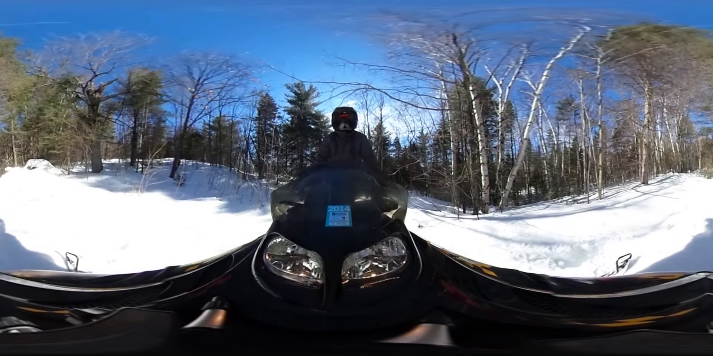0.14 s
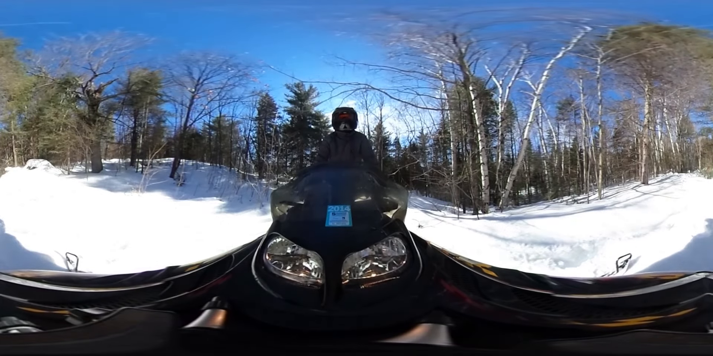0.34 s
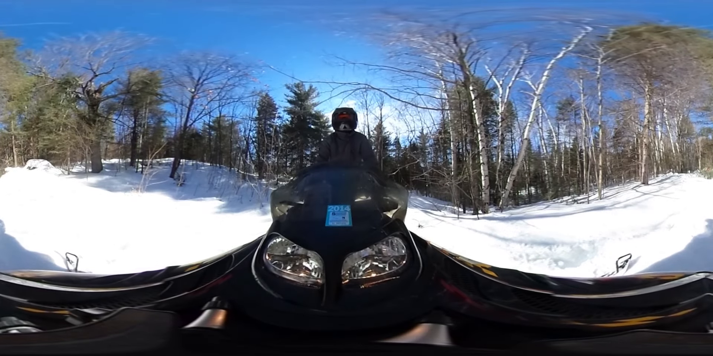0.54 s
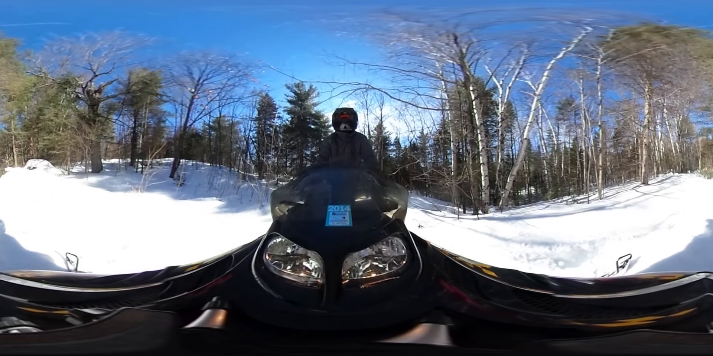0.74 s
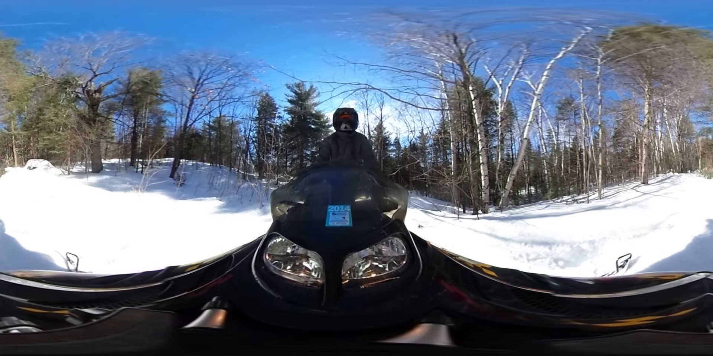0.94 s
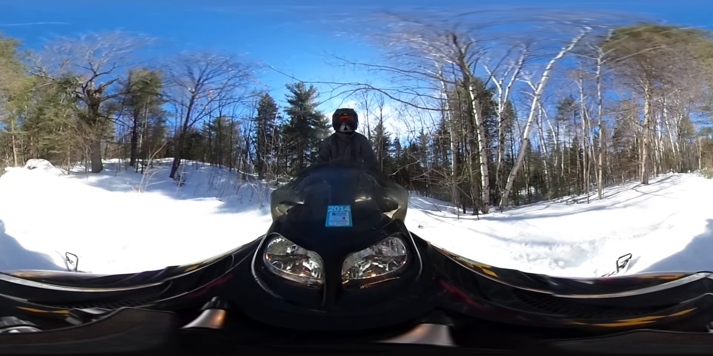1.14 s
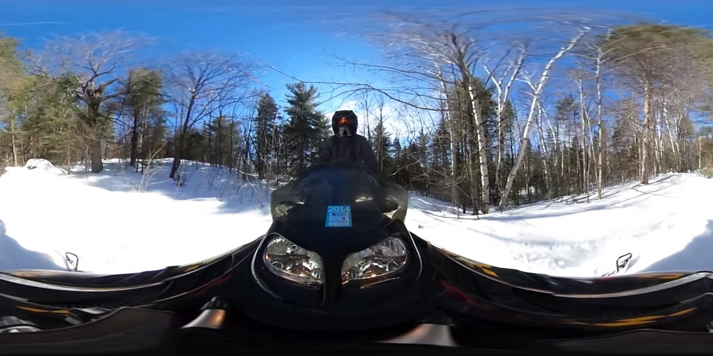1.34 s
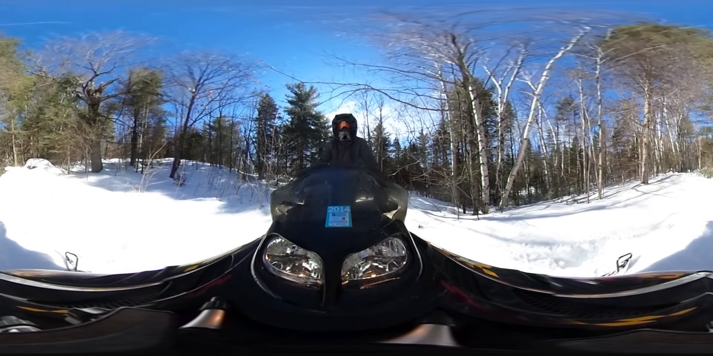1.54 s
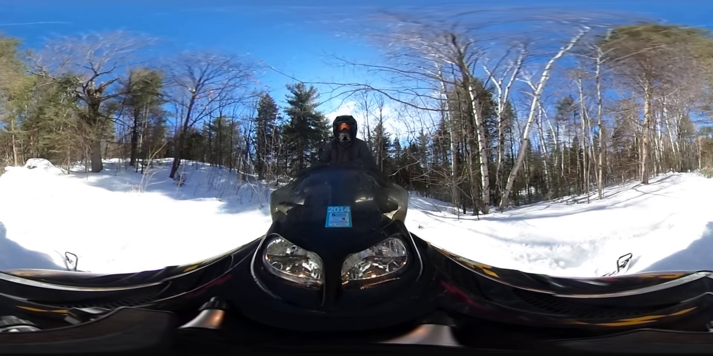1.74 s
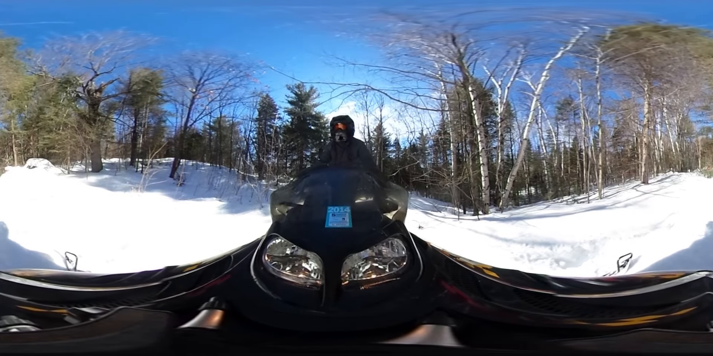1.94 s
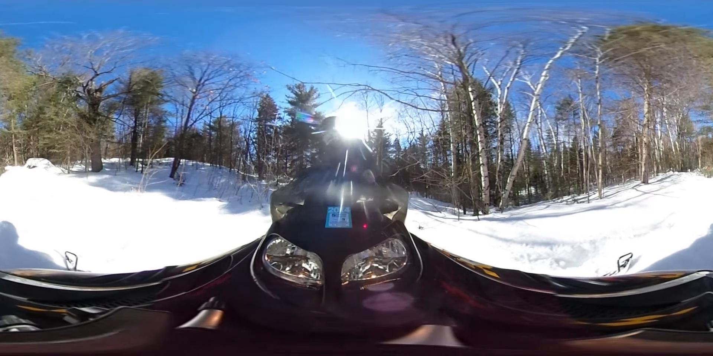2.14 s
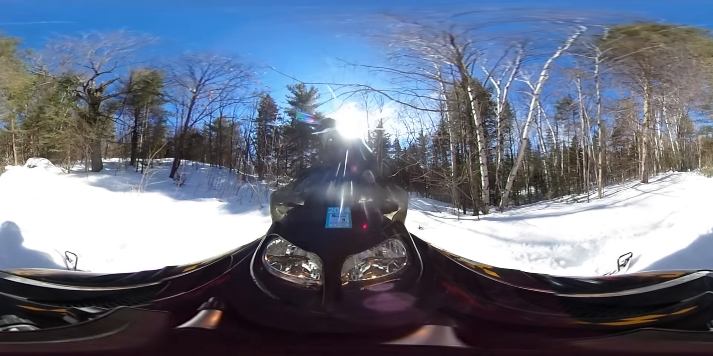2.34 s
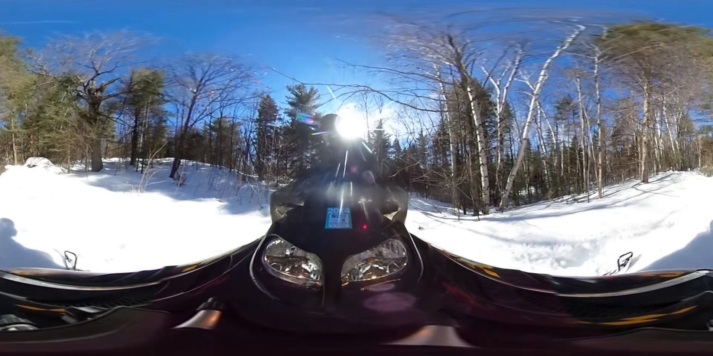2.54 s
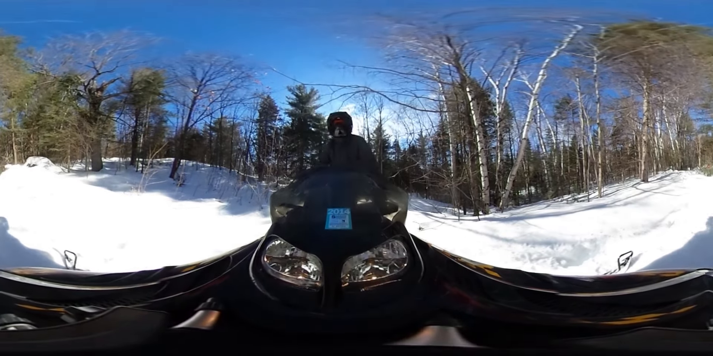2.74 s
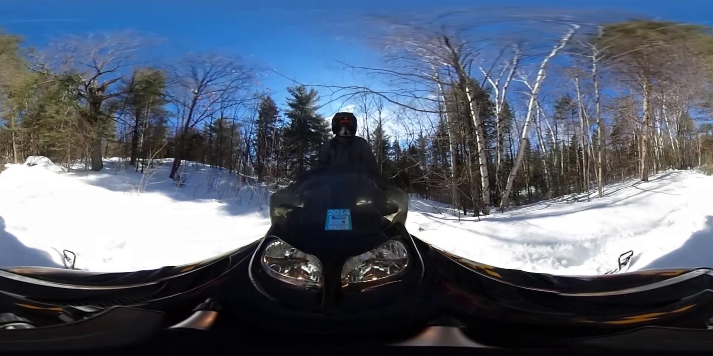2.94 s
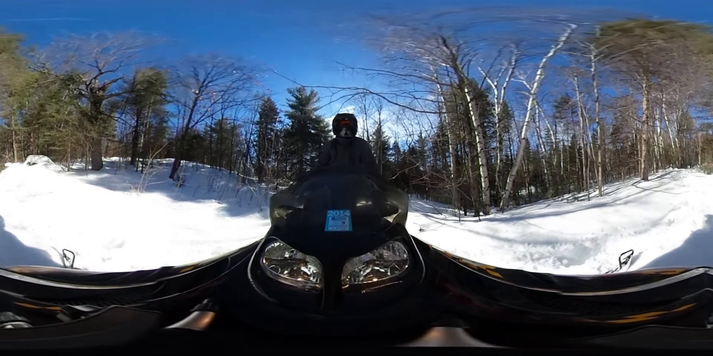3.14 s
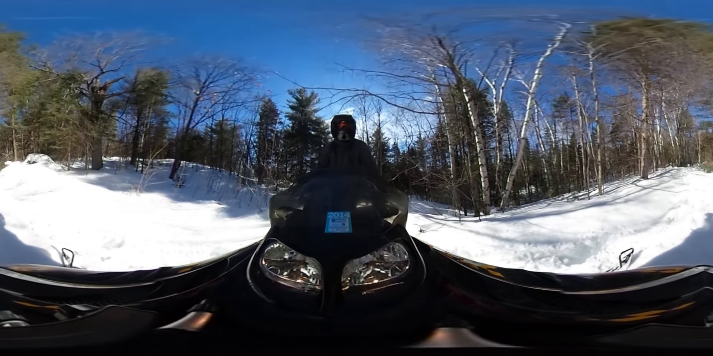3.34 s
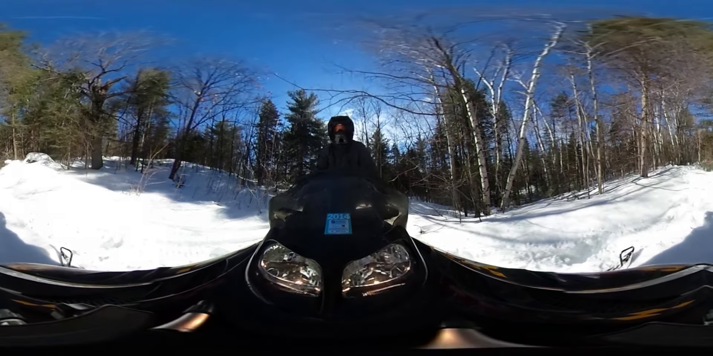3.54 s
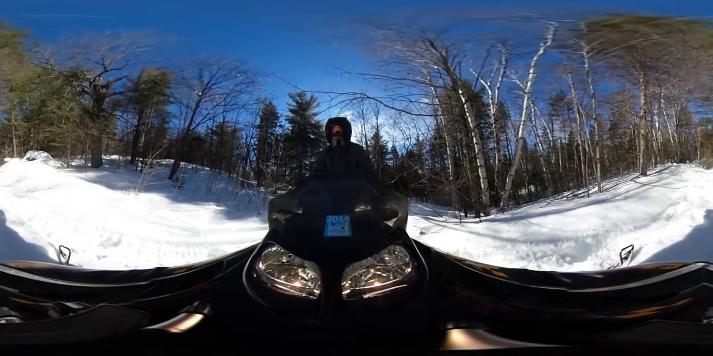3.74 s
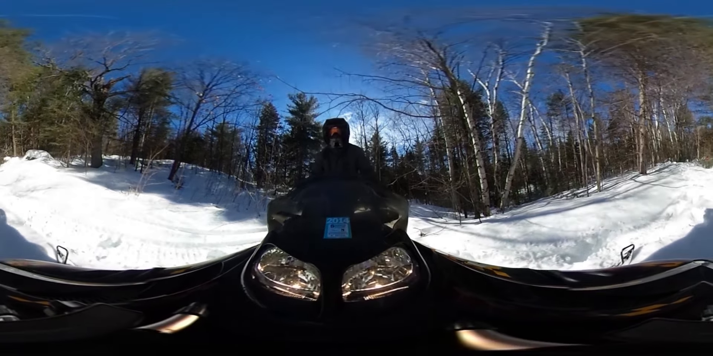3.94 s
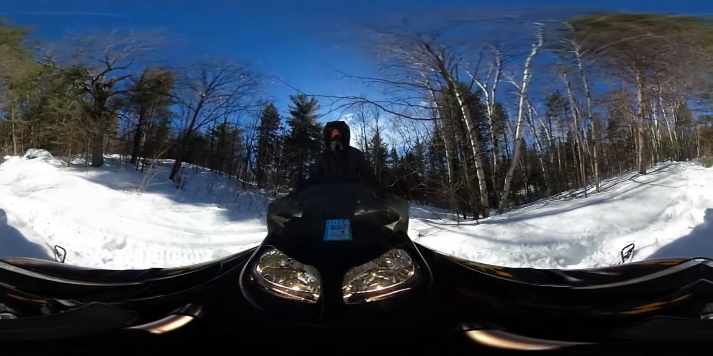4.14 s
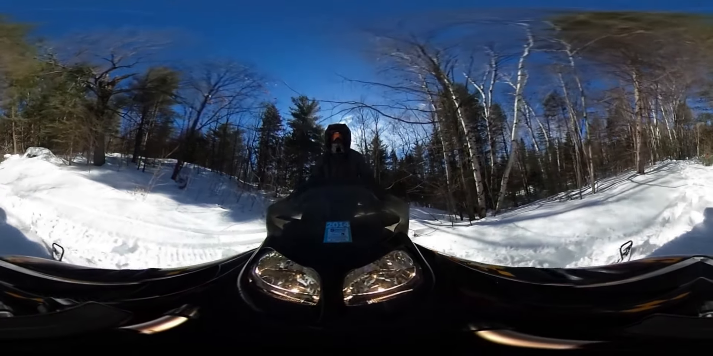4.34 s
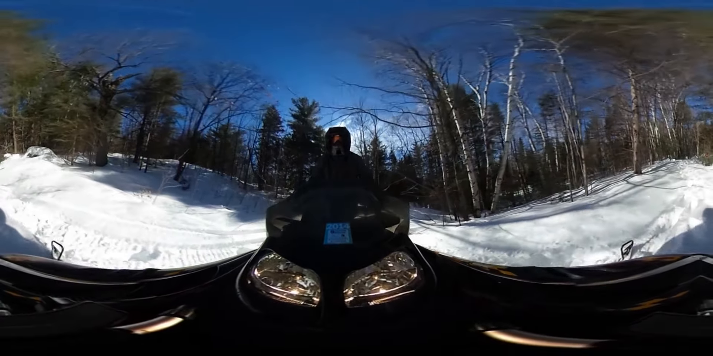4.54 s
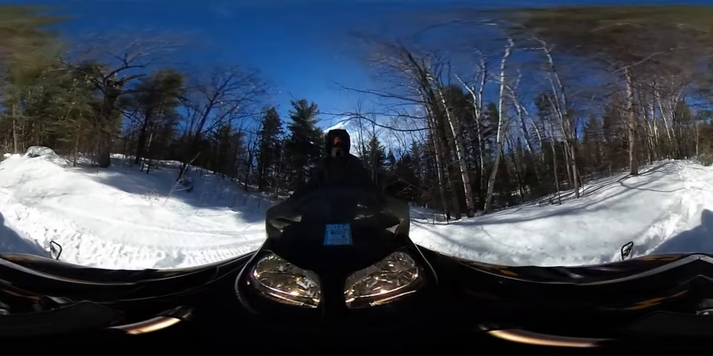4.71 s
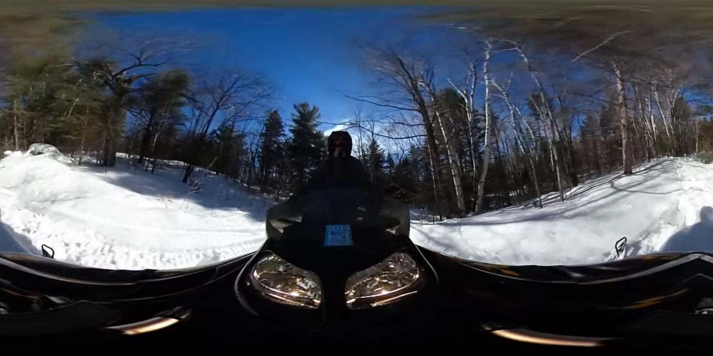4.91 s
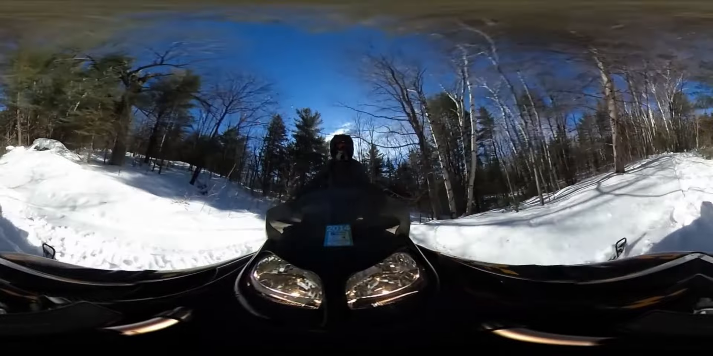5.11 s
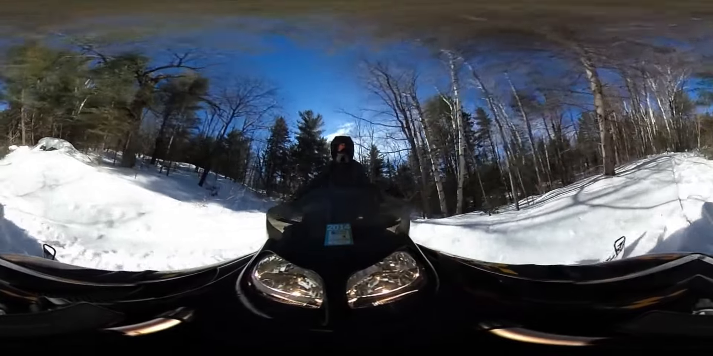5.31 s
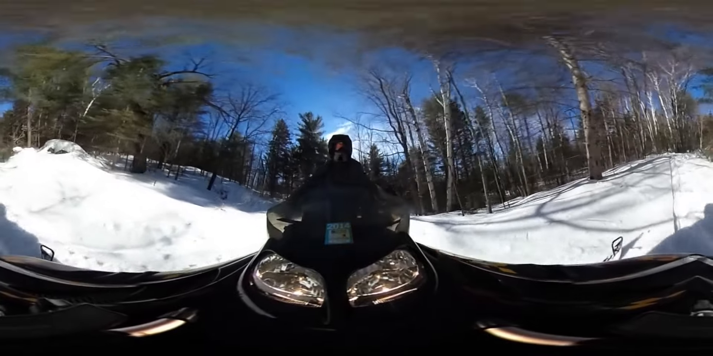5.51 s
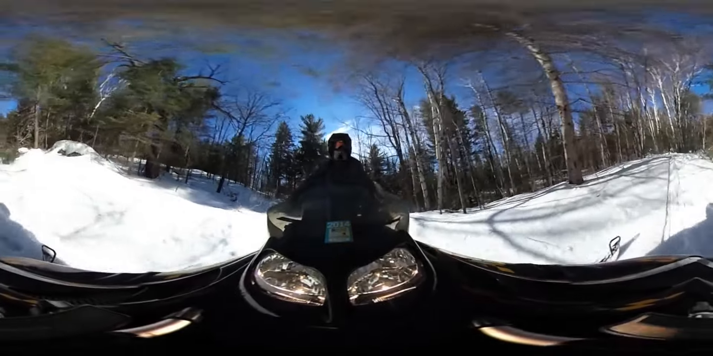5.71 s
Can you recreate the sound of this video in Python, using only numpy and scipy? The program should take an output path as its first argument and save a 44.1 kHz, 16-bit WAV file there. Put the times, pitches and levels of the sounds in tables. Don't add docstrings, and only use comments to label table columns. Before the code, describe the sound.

A snowmobile idles very close, a deep fluttering throb with dry mechanical ticking and slight speed wavering. Then it revs steeply through a rough, hammering surge and settles into a high steady drone, whining and hissing as the track runs. The hood-mounted microphone overloads; little of the open woods is heard.

```python
import sys
import numpy as np
from scipy import signal
from scipy.fft import rfft, irfft
from scipy.io import wavfile
from scipy.ndimage import uniform_filter1d

SR = 44100
rng = np.random.default_rng(int(sys.argv[2]) if len(sys.argv) > 2 else 0)


def pcm_store(signal):
    levels = np.round(np.clip(np.atleast_2d(signal), -1, 1) * 32767)
    wavfile.write(sys.argv[1], SR, levels.astype(np.int16).T)


def ratio(d):
    e = np.asarray(d, float) / 20
    return 10 ** e


N = 254450
T = np.arange(N) / SR
HZ = np.fft.rfftfreq(N, 1 / SR)
FOLD_HZ, TOP_HZ = 11980, 14560


def level(x, db):
    return x * ratio(db) / np.sqrt(np.mean(x ** 2))


def curves(table):
    s, *columns = np.transpose(table)
    return [np.interp(T, s, column) for column in columns]


def bells(x, rows):
    return sum(height * np.exp(-(2 * (x - centre) / width) ** 2) for centre, width, height in rows)


def walk(rate):
    hold = int(SR / rate)
    steps = np.repeat(rng.standard_normal(N // hold + 1), hold)
    return 1.291 * uniform_filter1d(uniform_filter1d(steps, hold), hold)[:N]


def colour(x, points, peaks=()):
    hz, db = np.transpose(points)
    shape_db = np.interp(np.log(HZ + 1), np.log(hz), db)
    shape_db = shape_db + sum(db / (1 + (2 * (HZ - f) / w) ** 2) for f, w, db in peaks)
    return irfft(rfft(x) * ratio(shape_db), N)


def ring(x, modes):
    out = 0
    for hz, width_hz, gain in modes:
        pole = np.exp((2j * hz - width_hz) * np.pi / SR)
        out = out + gain * signal.lfilter([1], [1, -pole], x).imag
    return out


def pulses(phase, at, size):
    place = np.interp(at, phase, np.arange(N - 0.), left=0, right=0)
    size = size * (place > 0)
    i, part = place.astype(int), place % 1
    early = np.bincount(i, size * (1 - part), N + 1)[:N]
    late = np.bincount(i + 1, size * part, N + 1)[:N]
    return early + late


def boom(phase, idle, ports, modes):
    k = np.arange(-1, int(phase[-1]))
    size_chance, lag_chance = rng.standard_normal((len(k), 2)).T
    size, lag = np.transpose(ports)
    uneven = np.interp(k, phase, idle)
    size = (1 + uneven * (size[k % 3] - 1)) * ratio(0.75 * size_chance)
    usual_lag = np.median(lag)
    at = k + usual_lag + uneven * (lag[k % 3] - usual_lag) + .005 * lag_chance
    push = np.hanning(int(SR / 250))
    return ring(np.convolve(pulses(phase, at, size), push / len(push))[:N], modes)


def exhaust_boom(phase, idle):
    ports = [(1, .437), (1, .421), (1.12, .447)]
    # frequency in Hz, width in Hz, signed gain as a ratio.
    modes = [(96.9, 34.7, .69), (127.4, 16.8, -1.59), (162.4, 20.8, .86)]
    return boom(phase, idle, ports, modes)


def airbox_boom(phase, idle):
    ports = [(1, .358), (1.04, .515), (1.05, .355)]
    # frequency in Hz, width in Hz, signed gain as a ratio.
    modes = [(42.3, 11, -.195), (80.7, 11.6, -.325), (146.8, 24.5, .97)]
    return boom(phase, idle, ports, modes)


def pipes(phase, idle, hz, boom_db):
    # firing rate in Hz, width in Hz, boom gain in dB.
    rate_gains = [(73, 15, -5.5), (108, 39, 5.5)]
    out = exhaust_boom(phase, idle) + airbox_boom(phase, idle)
    out = ratio(boom_db + bells(hz, rate_gains)) * out
    cycle = np.searchsorted(phase, phase[0] + 3)
    out[:cycle] = out[cycle:2 * cycle]
    return out


def load(phase, levels):
    # frequency in Hz, width in Hz, level in dB.
    block = [(430, 100, -3.5), (660, 310, 10), (2070, 100, -15)]
    k = np.arange(int(phase[-1]))
    crack_time, crack_size, slap_chance = rng.standard_normal((len(k), 3)).T
    blows = pulses(phase, k + .3 + .004 * crack_time, ratio(1.2 * crack_size))
    crack = ring(blows, [(f, w, ratio(db)) for f, w, db in block])
    slaps = pulses(phase, k + .55 + .004 * slap_chance, (k % 2) * ratio(1.2 * slap_chance))
    slap_band = signal.butter(2, [300, 950], "bandpass", fs=SR, output="sos")
    slap = signal.sosfilt(slap_band, slaps)
    out = ratio(levels["thump"]) * np.sqrt(2) * np.cos(2 * np.pi * phase)
    out = out + ratio(levels["crack"]) * crack / np.std(crack[-SR:])
    return out + ratio(levels["slap"]) * slap / np.std(slap[-SR:])


def clatter(phase, idle):
    # lower edge in Hz, upper edge in Hz, swell depth as a ratio, slow drift in dB.
    parts = [(0, 2800, .12, .3), (2800, 5200, .55, .5), (5200, 8300, 1.1, 1.2), (8300, 11980, 1.5, 1.5)]
    # frequency in Hz, spectral density in dB per Hz.
    spectrum = [(120, 1), (200, 0), (390, -8), (531, -5.5), (599, -1), (723, 0), (1230, -7.5), (1390, -8.5),
                (2130, -8), (3500, -23), (7560, -22.5), (8670, -33), (12000, -25), (15600, -56),
                (22000, -120)]
    # frequency in Hz, width in Hz, level in dB.
    cowl = [(406, 162, 9.5), (607, 69, 3.5), (1037, 100, 5), (1179, 14, 12), (1300, 12, 11.5),
            (2167, 170, 4), (5600, 370, 4), (11700, 320, 0.5)]
    k = np.floor(phase - .15).astype(int) + 1
    part = (phase - .15) % 1
    swell = np.clip(part / 0.1, 0, 1) * np.exp(-part / 0.27)
    cylinder_db = np.array([7., 8., 4.])[(k + 2) % 3]
    shared = rng.uniform(-.6, .6, k.max() + 1)
    mix = 0
    for lo_hz, hi_hz, depth, drift_db in parts:
        scatter = (shared + rng.uniform(-1, 1, k.max() + 1))[k]
        swell_db = cylinder_db + 2.5 * scatter
        gain_db = idle * depth * swell_db * swell + drift_db * walk(3.58)
        noise = rng.standard_normal(N) * ratio(gain_db)
        mix = mix + rfft(level(noise, 0)) * (HZ >= lo_hz) * (HZ < hi_hz)
    return level(colour(irfft(mix, N), [(100, -58)] + spectrum, cowl), 0)


def drive(phase, levels):
    # frequency in Hz, spectral density in dB per Hz.
    spectrum = [(120, -4.5), (200, -0.5), (340, -20), (383, 2), (550, -4.5), (984, 0.5), (1190, 0.5),
                (1670, -8.5), (2200, -6.5), (4080, -18.5), (12000, -22), (15600, -23), (22000, -120)]
    orders = 8.14, 9.16, 16, 17
    # centre in seconds, length in seconds, lower and upper whine gain in dB.
    surges = [
        (3.98, 0.3, 1.5, -2.5),
        (5.064, 0.12, -3, -4),
        (5.21, 0.25, 7, 0),
        (5.346, 0.12, -11, 3.5),
        (5.52, 0.13, 2.5, 6),
        (5.77, 0.17, -4, 4.5),
    ]
    low_db = levels["low_whine"] + bells(T, [(s, length, low) for s, length, low, _ in surges])
    high_db = levels["high_whine"] + bells(T, [(s, length, high) for s, length, _, high in surges])
    chain_db = levels["chain"]
    hiss_points = [(20, -28), (50, -54), (100, -7)] + spectrum
    hiss = colour(rng.standard_normal(N), hiss_points, [(2260, 190, 2.7), (930, 90, 1.3)])
    out = level(hiss, 0) * ratio(levels["hiss"])
    tone_levels = low_db, high_db, chain_db, chain_db
    waver_hz = 3.5, 3.5, 1.5, 4
    for order, db, hz in zip(orders, tone_levels, waver_hz):
        waver = np.cumsum(hz * walk(35)) / SR
        flutter_db = 1.6 * walk(25)
        out += ratio(db + flutter_db) * np.sqrt(2) * np.sin(2 * np.pi * (order * phase + waver))
    return out


def effort(hz):
    # dB at idle, dB at cruising speed, dB added at full strain.
    source_levels = dict(boom=(1.31, -3.5, 2.4), clatter=(-24, -25.5, 15.7), hiss=(-46, -6.5, 3.9),
                     low_whine=(-47, -15, 1.3), high_whine=(-44, -13.5, 1.4), chain=(-51, -21.5, 1.5),
                     crack=(-35, -21, 18.3), slap=(-44, -16, 3), thump=(-51, -27.5, 29.7))
    # time in seconds, strain from 0 to 1 as the engine labours against the clutch.
    labour = [
        (3.2, 0.07),
        (3.45, 0.46),
        (3.75, 0.96),
        (3.95, 0),
        (4.3, 0),
    ]
    idle_hz, cruise_hz = 41, 127
    rev = np.clip(np.log(hz / idle_hz) / np.log(cruise_hz / idle_hz), 0, 1)
    strain, = curves(labour)
    return {name: idle_db + rev * (cruise_db - idle_db) + strain * strain_db
            for name, (idle_db, cruise_db, strain_db) in source_levels.items()}


def scene():
    # time in seconds, firing rate in Hz; the rate glides by a steady ratio between rows.
    speed = [(0.0, 39.5), (0.29, 39.87), (0.91, 38.11), (1.12, 37.08), (1.44, 38.12), (1.61, 39.35),
             (2.19, 39.32), (2.37, 37.92), (2.73, 36.66), (3.26, 41.03), (3.38, 47.14), (3.9, 123.11),
             (3.97, 127.48), (4.42, 130.96), (4.53, 129.7), (5.22, 128.59), (5.31, 130.31), (5.77, 133.06)]
    # frequency in Hz, width in Hz, gain in dB.
    harmonic_dip = [(263, 96, -9)]
    hz = np.exp(curves([(s, np.log(f)) for s, f in speed])[0])
    phase = np.cumsum(hz) / SR - .207
    db = effort(hz)
    idle = np.clip((47 - hz) / 6, .04, 1)
    engine = pipes(phase, idle, hz, db["boom"]) + load(phase, db)
    exhaust = colour(engine, [(20, 0), (20000, 0)], harmonic_dip)
    return (exhaust + ratio(db["clatter"]) * clatter(phase, idle) + drive(phase, db))[None]


def treble_dropouts(x):
    # centre in seconds, length in seconds, share of bands lost from 0 to 1.
    dropouts = [(.615, .02, .4), (.83, .02, .4), (.99, .02, .5), (1.09, .015, .5), (1.135, .03, .6),
                (1.27, .04, .6), (1.32, .02, .4), (1.41, .015, .5), (1.45, .03, .6), (2.41, .02, .3),
                (2.455, .02, .4), (2.565, .012, .7), (2.612, .028, .9), (2.73, .015, .5)]
    spectrum, out = rfft(x), 0
    edges_hz = np.r_[0, np.arange(3000, 12000, 350), SR]
    luck = rng.uniform(size=(len(dropouts), len(edges_hz)))
    for k, (lo_hz, hi_hz) in enumerate(zip(edges_hz, edges_hz[1:])):
        holes = []
        for j, (s, length, share) in enumerate(dropouts):
            lost = luck[j, k] < share ** 1.3 * min(lo_hz / 8000, 1)
            holes.append((s, length, 1.3 * lost))
        band = irfft(spectrum * (HZ >= lo_hz) * (HZ < hi_hz), N)
        out = out + band * ratio(-18 * np.minimum(bells(T, holes), 1))
    return out


def faint_top(clipped):
    # centre in seconds, length in seconds, threshold change in dB.
    spells = [
        (.3, .6, -9),
        (.86, .06, -10),
        (1.35, .4, -8),
        (2.55, .2, -9),
        (2.95, .5, -8),
        (3.42, .35, -14),
    ]
    faint = clipped * ratio(-9.5 - 5 * (HZ - FOLD_HZ) / 2000)
    edges_hz = np.linspace(FOLD_HZ, TOP_HZ, num=5)
    whole = irfft(faint * (HZ >= FOLD_HZ) * (HZ < TOP_HZ), N)[0]
    power = uniform_filter1d(whole ** 2, size=500)
    threshold_db = -65.5 + bells(T, spells) + 4 * walk(60)
    out = 0
    for lo_hz, hi_hz in zip(edges_hz, edges_hz[1:]):
        loud = power > ratio(threshold_db + 2.5 * walk(45)) ** 2
        band = irfft(faint * (HZ >= lo_hz) * (HZ < hi_hz), N)
        out = out + uniform_filter1d(1. * loud, size=200) * band
    return out


def roll_off(x):
    return signal.sosfilt(signal.butter(12, 14850, fs=SR, output="sos"), x)


def record(dry):
    clip = 0.62
    clipped = rfft(np.clip(dry, -clip, clip))
    body = ratio(3.3 * (HZ / FOLD_HZ) ** 6) * (HZ > 4) * (HZ < FOLD_HZ)
    mix = treble_dropouts(irfft(clipped * body, N) + faint_top(clipped))
    return roll_off(mix)


dry = scene()
out = record(dry)
pcm_store(out)
```